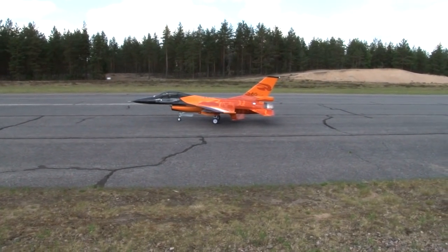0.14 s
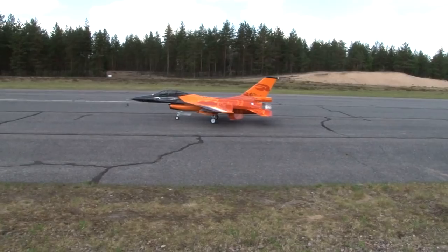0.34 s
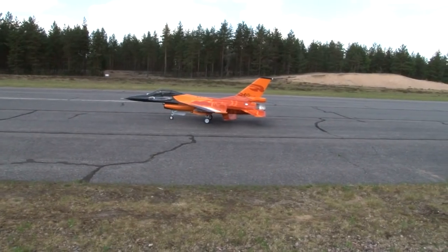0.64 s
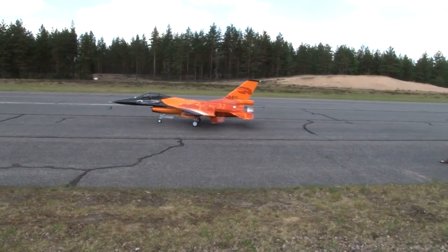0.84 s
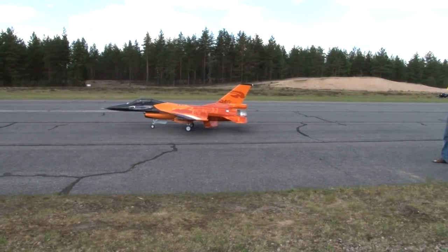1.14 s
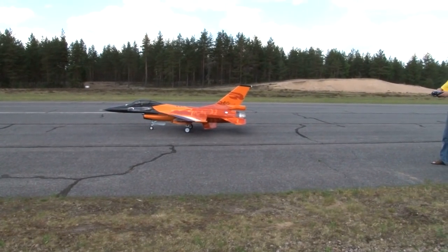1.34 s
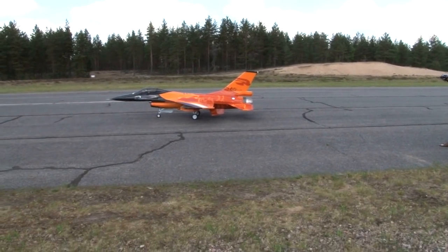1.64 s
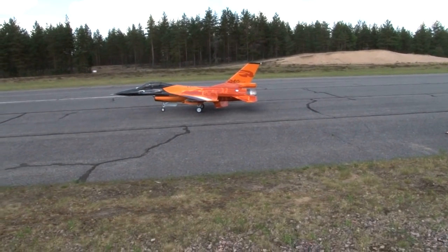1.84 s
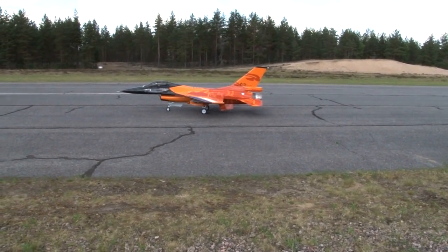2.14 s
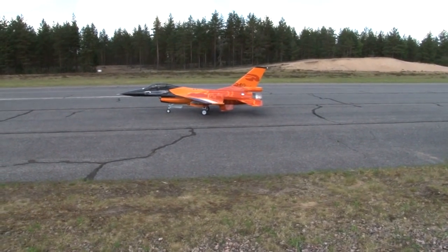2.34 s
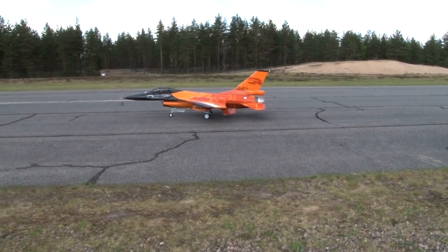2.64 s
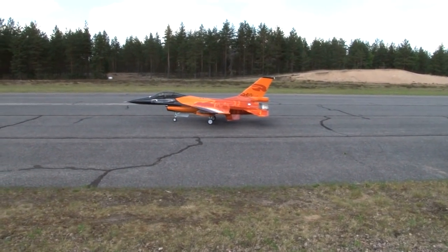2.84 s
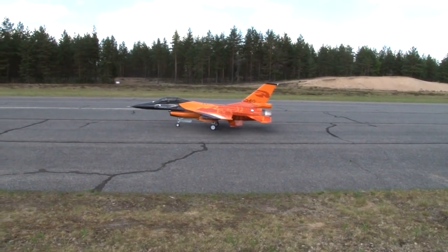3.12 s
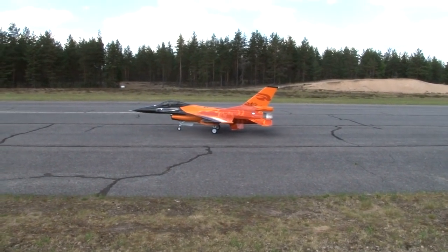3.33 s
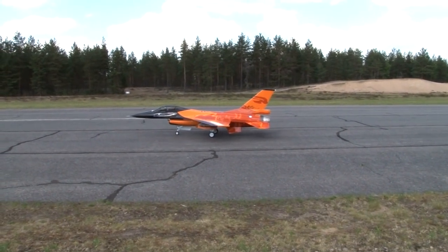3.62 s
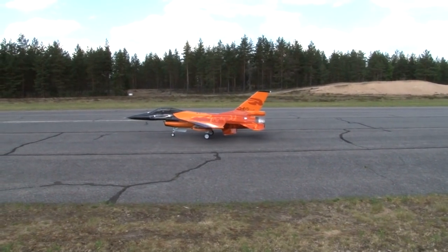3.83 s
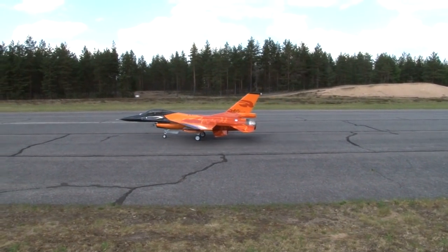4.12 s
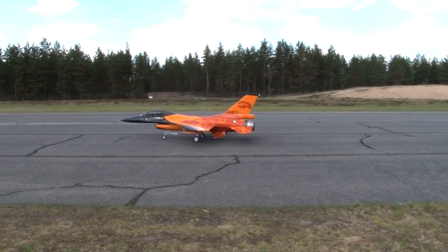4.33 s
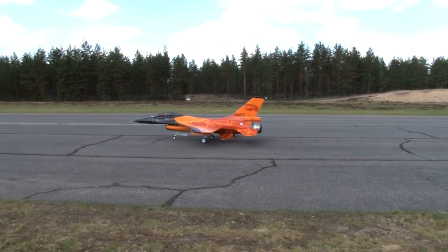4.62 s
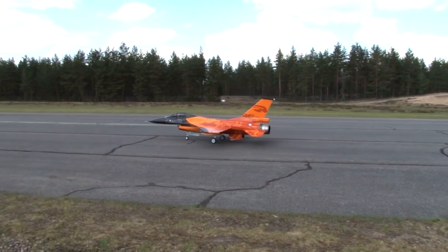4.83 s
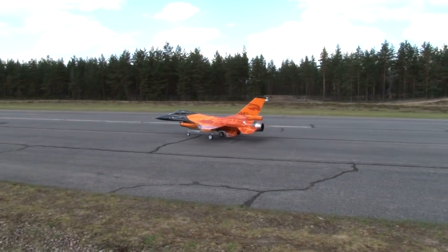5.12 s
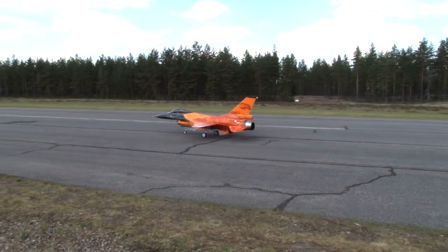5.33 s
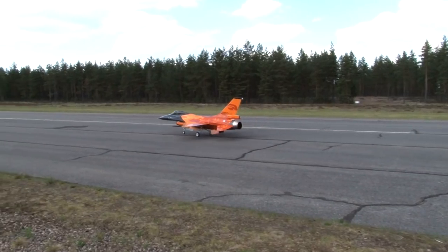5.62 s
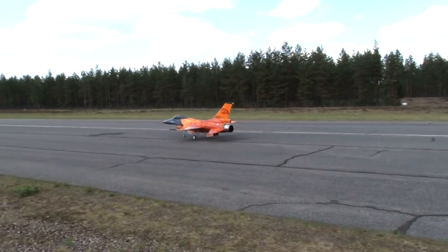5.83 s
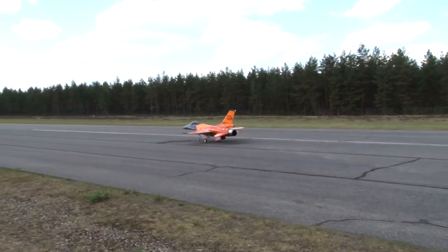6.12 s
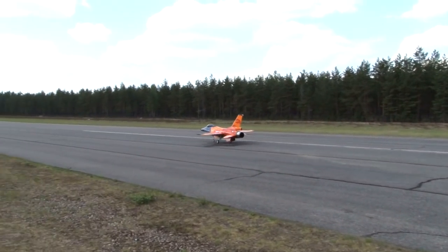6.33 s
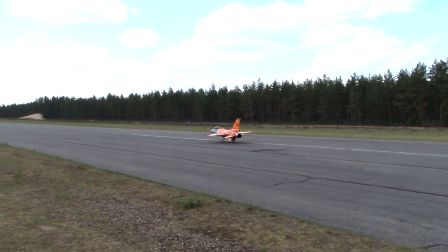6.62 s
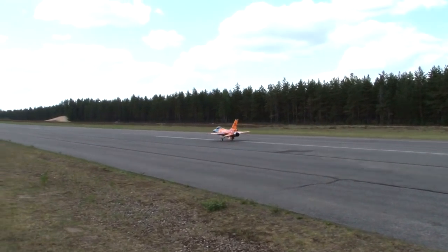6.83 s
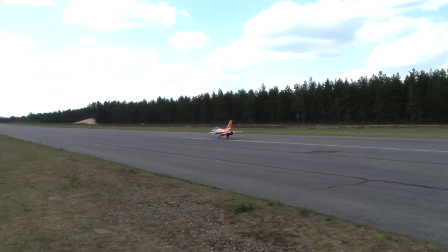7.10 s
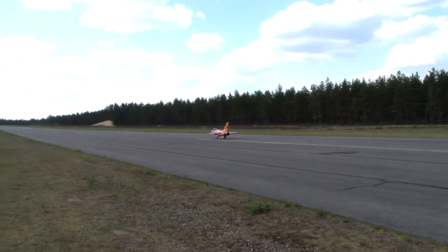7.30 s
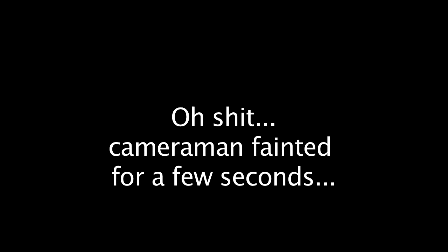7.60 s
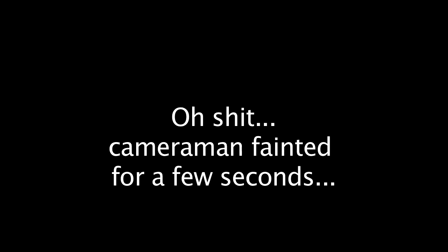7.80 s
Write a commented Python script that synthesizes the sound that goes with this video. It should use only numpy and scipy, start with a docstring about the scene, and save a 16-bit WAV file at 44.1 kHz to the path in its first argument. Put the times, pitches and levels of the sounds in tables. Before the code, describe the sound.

On an outdoor runway, a model jet idles with an airy hiss and a hollow burning sound, while a second turbine whines thinly nearby. The jet spools up, growing louder as its whine climbs. It rolls past with a bright exhaust hiss, then turns into a lower roar with a rising, sweeping tone as it moves away. The microphone, a few metres off, overloads slightly on the peaks before the sound cuts off.

```python
"""An airstrip, microphone about 6 m off the runway line. A model jet idles, a second turbine idling nearby:
intake hiss, blade whine and flame noise in a hollow tailpipe. At 1 s the jet spools up; at 3 s it rolls.
Side-on, just after 4 s, its exhaust hisses brightly; then the tail turns to us with a low roar, and the
echo off the asphalt sweeps upward. The microphone overloads on the peaks.
At 7.6 s, with the jet some 20 m away, the sound stops dead."""
import sys
import numpy as np
from scipy.fft import rfft, irfft
from scipy.io import wavfile

SR = 44100
rng = np.random.default_rng(int(sys.argv[2]) if len(sys.argv) > 2 else 0)


def put_to_file(sound):
    """Save the sound as 16-bit audio at rate SR, in the file named by the first command-line argument."""
    columns = np.atleast_2d(sound).T  # one column per channel
    safe = np.clip(columns, -1, 1)
    whole_steps = np.round(safe * 32767)
    wavfile.write(sys.argv[1], SR, whole_steps.astype(np.int16))


N = 351036
TIME = np.arange(N) / SR
FREQ = np.maximum(np.fft.rfftfreq(N, 1 / SR), 1)

# air rushing into the intake: pitch_hz, level_db
INTAKE_SPECTRUM = [(50,-22),(170,-13.5),(300,-25.5),(500,-16.5),(1500,-11),(3000,-10.5),(4000,-6.5),(4600,-4.5),(5500,-1),(6300,3),(7200,-5.5),(8000,-1.5),(8600,-16)]
# intake duct resonances: pitch_hz, width_hz, gain_db
INTAKE_MODES = [(1020, 90, 3.5), (1420, 49, 19), (1800, 100, 2.2), (2310, 100, 3.2), (2885, 120, 6.6),
                (3355, 63, 13), (6270, 160, 3)]
# combustion noise in the tailpipe: pitch_hz, level_db
PIPE_SPECTRUM = [(20,-49),(50,-32),(90,-19),(150,-14),(220,-8),(315,-13),(550,0),(800,-5),(1200,-8.5),(2200,-14),(3200,-16.5),(4500,-24),(8600,-22)]
# tailpipe resonances: pitch_hz, width_hz, gain_db
PIPE_MODES = [(164,32,5.8),(210,45,5.6),(256.3,27,4.2),(462.7,53,8.6),(607,32,3.2),(666,60,0.86),(924,86,7.4),(1036,56,8),(2280,110,4.2),(2984,220,5)]
# hotter gas carries sound faster and lifts the pipe resonances: time_s, pitch_ratio
PIPE_TUNING = [(0,1),(1.2,0.98),(2,0.97),(3,1.006),(4.5,1.04),(7.5,0.84)]
# steady whines of the second turbine: pitch_hz, width_hz, level_db
IDLE_WHINES = [(4260,28,-50.5),(5050,110,-45.5),(6360,23,-39.5),(7150,19,-44.5),(7140,34,-55)]
# lower, rushing peak of the slower jet: pitch_hz, level_db
RUSH_SPECTRUM = [(500,-33.5),(1400,-7),(2100,-2.5),(2900,-7.5),(3600,-13),(8000,-28.5)]
# fine eddies of the jet: pitch_hz, level_db
HISS_SPECTRUM = [(20,-42),(80,-21),(300,-11),(600,-8),(1200,-4.5),(2000,-3),(2900,-3.5),(3900,-8.5),(4700,-1.5),(5500,1),(6300,1),(7200,-6),(8000,-2.5),(8600,-8)]
# rumble of the pass: pitch_hz, level_db
RUMBLE_SPECTRUM = [(15,-4.5),(40,-7),(90,1),(150,3),(300,-25),(1000,-51),(9000,-94)]
# large eddies of the jet: pitch_hz, level_db
ROAR_SPECTRUM = [(20,-49),(70,-30),(150,-8),(330,-8.5),(500,0),(750,-6),(1100,-1.5),(1700,-1.5),(2500,-4.5),(3600,-14),(5000,-19),(8600,-23)]
# humps in the roar: pitch_hz, width_hz, gain_db
ROAR_HUMPS = [(220, 67, 3.8), (467, 120, 0.74), (640, 39, 1.4), (936, 180, 5.9), (4105, 270, 11)]
# core of the rearward beam: pitch_hz, level_db
BEAM_SPECTRUM = [(100,-35),(280,-10),(390,-2),(500,1),(620,2),(760,-16.5),(1500,-25),(8000,-42)]
# how each named sound radiates, at full power and nearest distance, angles off the nose:
# level_db, idle_drop_db, loudest_deg, nose_fall_db_per_deg, tail_fall_db_per_deg
RADIATION = { "intake": (-19, 8.5, 80, 0, 1.6), "blades": (-35, 20, 92, -0.5, 1),
             "pipe": (-15.7, 15, 98, 0, 0.76), "rush": (-11.5, 43.5, 89, 0, 1.1),
             "hiss": (-2, 28.5, 138.5, 0.1324, 0.08), "rumble": (-31.5, 28.5, 124.5, 0.8, 0.3),
             "roar": (-4.2, 29, 152.5, 0.54, 0.11), "beam": (-7.5, 34, 150.5, 1.0, 1.24), }
# stereo width across the spectrum: pitch_hz, side_gain_db
STEREO_WIDTH = [(30,-9.5),(90,-7.5),(180,-22.5),(350,-21.5),(700,-18.5),(1400,-17),(2800,-40.5),(5000,-20.5)]
# the stereo image narrows as the jet passes, then widens again: time_s, side_gain_db
SIDE_LEVEL = [(0,4),(1.5,2.5),(3,0),(4.2,-3.5),(5,-29.5),(6,-2),(6.7,-9),(7.3,2.5)]
# the lows and low mids lean to the right: pitch_hz, left_minus_right_db
STEREO_LEAN = [(30,-.7),(90,-1.2),(180,-1.3),(350,-1.7),(700,-.7),(1400,0)]
# colour of the microphone housing: pitch_hz, width_hz, gain_db
HOUSING_MODES = [(3220, 310, 5), (3506, 260, -3), (4084, 270, 5), (4715, 600, -5), (5400, 460, 1.5),
                 (7244, 810, 6.5)]

THROTTLE_S, FLAME_RISE_S, SPOOL_UP_S = 1.084, 0.9, 3.75
BLADE_IDLE_HZ, BLADE_FULL_HZ, OCTAVE_DB = 3370, 7450, 4
DUCT_HZ, DUCT_WIDTH_HZ = 7160, 1500
# the roll starts a little before the point nearest the microphone
BRAKES_OFF_S, ACCELERATION_M_PER_S2, START_BEFORE_M, NEAREST_M = 3.18, 2.187, 0.95, 5.81
SHADE_DB, NOZZLE_SEEN_DEG, SHADE_EDGE_DEG = 3.5, 89.8, 2.8
NOTCH_START_HZ, NOTCH_HZ_PER_M, ECHO_GAIN = 1250, 80, 0.39
STEREO_TOP_HZ, CUTOFF_HZ, STOP_S = 5450, 8780, 7.577


def from_db(db):
    """Decibels to gain."""
    return 10 ** (np.asarray(db) / 20)


def rms_one(x):
    """Scale to rms 1."""
    return x / np.sqrt(np.mean(x ** 2) + 1e-20)


def in_time(points):
    """A curve of (time_s, value) points at every sample."""
    return np.interp(TIME, *np.transpose(points))


def slope_gain(points):
    """Gain per frequency through (pitch_hz, level_db) points."""
    hz, db = np.transpose(points)
    return from_db(np.interp(np.log(FREQ), np.log(hz), db))


def mode_gain(modes):
    """Gain per frequency of bell-shaped resonances."""
    return from_db(sum(db / (1 + (2 * (FREQ - hz) / width) ** 2) for hz, width, db in modes))


def low_pass(edge_hz, order):
    """Gain per frequency of a steep low-pass."""
    return 1 / np.sqrt(1 + (FREQ / edge_hz) ** (2 * order))


def white():
    """Spectrum of fresh white noise."""
    return rfft(rng.standard_normal(N))


def drift(rate_hz):
    """Random wander, mostly slower than rate_hz; rms 1."""
    return rms_one(irfft(white() / (1 + (FREQ / rate_hz) ** 2), N))


def turbulence(spectrum, modes=()):
    """Flow noise through its resonances."""
    return irfft(white() * rms_one(slope_gain(spectrum)) * mode_gain(modes), N)


def whine(hz, width_hz):
    """A blade tone, smeared into a narrow band by unsteady inflow."""
    phase = 2 * np.pi * np.cumsum(hz * np.ones(N)) / SR
    return drift(width_hz) * np.cos(phase) + drift(width_hz) * np.sin(phase)


def flame():
    """Combustion builds quickly as the throttle opens: 0 at idle, 1 at full heat."""
    return 1 - np.exp(-np.maximum(TIME - THROTTLE_S, 0) / FLAME_RISE_S)


def shaft_speed():
    """The heavy shaft follows in an S-curve: 0 at idle, 1 at full speed."""
    progress = np.clip((TIME - THROTTLE_S) / SPOOL_UP_S, 0, 1)
    return progress ** 2 * (3 - 2 * progress)


def rolled_m():
    """Distance down the runway under steady acceleration."""
    return .5 * ACCELERATION_M_PER_S2 * np.maximum(TIME - BRAKES_OFF_S, 0) ** 2


def off_nose_deg():
    """Angle between the aircraft's nose and the microphone."""
    return np.degrees(np.arctan2(NEAREST_M, START_BEFORE_M - rolled_m()))


def gain_at_mic(name, power, flutter_db, flutter_hz):
    """Gain of one sound from engine power, angle and distance, fluttering as the eddies come and go."""
    full_db, idle_drop_db, loudest_deg, nose_fall, tail_fall = RADIATION[name]
    off_deg = off_nose_deg() - loudest_deg
    aim_db = nose_fall * np.minimum(off_deg, 0) - tail_fall * np.maximum(off_deg, 0)
    level_db = full_db - idle_drop_db * (1 - power) + aim_db + flutter_db * drift(flutter_hz)
    distance_m = np.hypot(NEAREST_M, rolled_m() - START_BEFORE_M)
    return from_db(level_db) * NEAREST_M / distance_m


def intake():
    """Inrushing air rings the duct; it fades once the nose has passed the microphone."""
    air = turbulence(INTAKE_SPECTRUM, INTAKE_MODES)
    return air * gain_at_mic("intake", shaft_speed(), flutter_db=0.64, flutter_hz=19)


def through_duct(hz):
    """The intake duct lets blade tones out best in one band."""
    return 1 / np.sqrt(1 + ((hz - DUCT_HZ) / DUCT_WIDTH_HZ) ** 4)


def compressor():
    """The blade-passing tone and its octave climb with the shaft speed, half buried in the hiss."""
    blade_hz = BLADE_IDLE_HZ + (BLADE_FULL_HZ - BLADE_IDLE_HZ) * shaft_speed()
    tone = through_duct(blade_hz) * whine(blade_hz, width_hz=230)
    octave = from_db(OCTAVE_DB) * through_duct(2 * blade_hz) * whine(2 * blade_hz, width_hz=160)
    return (tone + octave) * gain_at_mic("blades", flame(), flutter_db=1.2, flutter_hz=9)


def tailpipe():
    """Combustion rings the hollow pipe; its resonances move with the speed of sound in the gas."""
    burn = turbulence(PIPE_SPECTRUM, PIPE_MODES)
    position = np.cumsum(in_time(PIPE_TUNING)) % N
    retuned = np.interp(position, np.arange(N), burn)
    return retuned * gain_at_mic("pipe", flame(), flutter_db=0.3, flutter_hz=29)


def idling_turbine():
    """The blades of the second turbine, nearby: thin whines that keep their pitch."""
    return sum(from_db(db) * whine(hz, width) for hz, width, db in IDLE_WHINES)


def jet_rush():
    """The exhaust rushes as it gathers speed, fading once the aircraft is past."""
    rush = turbulence(RUSH_SPECTRUM)
    return rush * gain_at_mic("rush", shaft_speed(), flutter_db=1.5, flutter_hz=28)


def jet_hiss():
    """Fine eddies hiss to the side and rear, shaded by the fuselage until the nozzle comes into view."""
    hidden = .5 - .5 * np.tanh((off_nose_deg() - NOZZLE_SEEN_DEG) / SHADE_EDGE_DEG)
    hiss = turbulence(HISS_SPECTRUM) * from_db(-SHADE_DB * hidden)
    return hiss * gain_at_mic("hiss", shaft_speed(), flutter_db=0.5, flutter_hz=21)


def jet_rumble():
    """Low flow noise swells as the jet goes by."""
    rumble = turbulence(RUMBLE_SPECTRUM)
    return rumble * gain_at_mic("rumble", shaft_speed(), flutter_db=-2.0, flutter_hz=8)


def jet_roar():
    """Large eddies beam a roar to the rear; its narrow core sweeps over the microphone."""
    roar = turbulence(ROAR_SPECTRUM, ROAR_HUMPS)
    roar *= gain_at_mic("roar", shaft_speed(), flutter_db=0.05, flutter_hz=50)
    core = turbulence(BEAM_SPECTRUM)
    core *= gain_at_mic("beam", shaft_speed(), flutter_db=0.2, flutter_hz=28)
    return roar + core


def over_asphalt(x, dull_hz):
    """The ground echo lags less as the aircraft recedes, so its notches sweep upward."""
    lag_s = .5 / (NOTCH_START_HZ + NOTCH_HZ_PER_M * rolled_m())
    echo = irfft(rfft(x) * np.exp(-(FREQ / dull_hz) ** 2), N)
    return x + ECHO_GAIN * np.interp(TIME - lag_s, TIME, echo)


def stereo_spread(x, decay_s):
    """Diffuse stereo spread in the lows and mids, with centred treble."""
    smear = rfft(rng.standard_normal(N) * np.exp(-TIME / decay_s))
    smear /= np.sqrt(np.mean(np.abs(smear) ** 2))
    colour = slope_gain(STEREO_WIDTH) * low_pass(STEREO_TOP_HZ, order=50)
    side = irfft(rfft(x) * smear * colour, N) * from_db(in_time(SIDE_LEVEL))
    return x + side * [[1], [-1]]


def scene():
    """Both turbines in the open air, in stereo from beside the runway."""
    airflow = intake() + tailpipe() + jet_rush() + jet_hiss() + jet_roar() + jet_rumble()
    aircraft = over_asphalt(airflow, dull_hz=5000) + compressor()
    stereo = stereo_spread(aircraft + idling_turbine(), decay_s=0.06)
    lean = slope_gain(STEREO_LEAN) ** np.array([[.5], [-.5]])
    return irfft(rfft(stereo) * lean, N)


def overload(x, ceiling, knee):
    """The microphone passes quiet sound cleanly and flattens the peaks."""
    return x / (1 + np.abs(x / ceiling) ** knee) ** (1 / knee)


def record(dry):
    """At the microphone: housing colour, overload, a sudden stop with a tiny tail, a steep top cut."""
    coloured = irfft(rfft(dry) * mode_gain(HOUSING_MODES), N)
    clipped = overload(coloured, ceiling=0.76, knee=7.1)
    tail = from_db(-25) * np.exp(-np.abs(TIME - STOP_S) / 0.018)
    stopped = clipped * np.where(TIME < STOP_S, 1, tail)
    return irfft(rfft(stopped) * low_pass(CUTOFF_HZ, order=150), N)


dry = scene()
out = record(dry)
put_to_file(out)
```